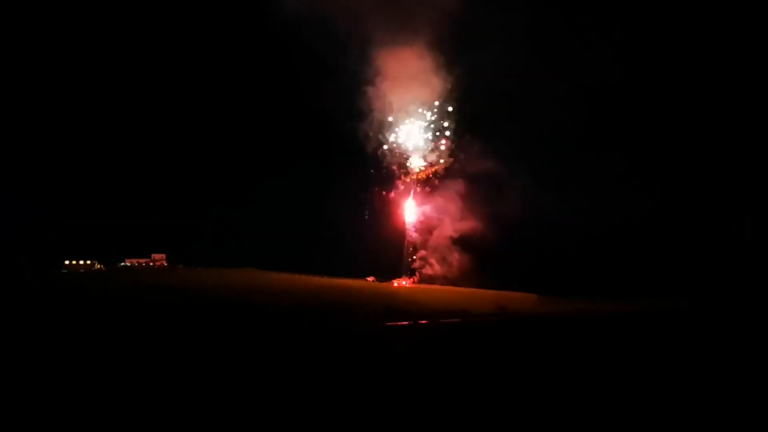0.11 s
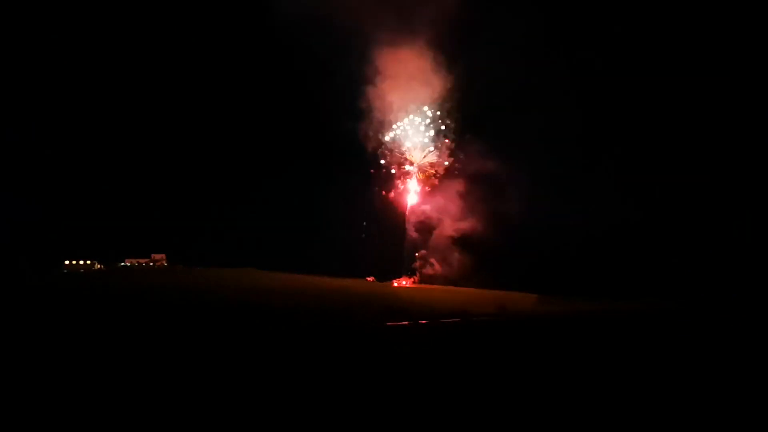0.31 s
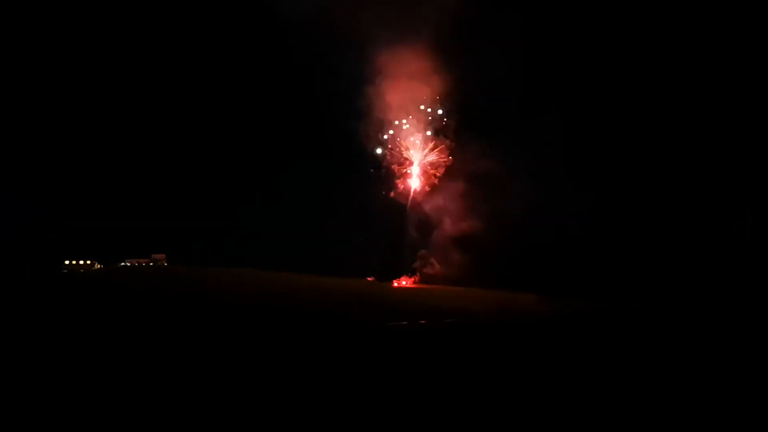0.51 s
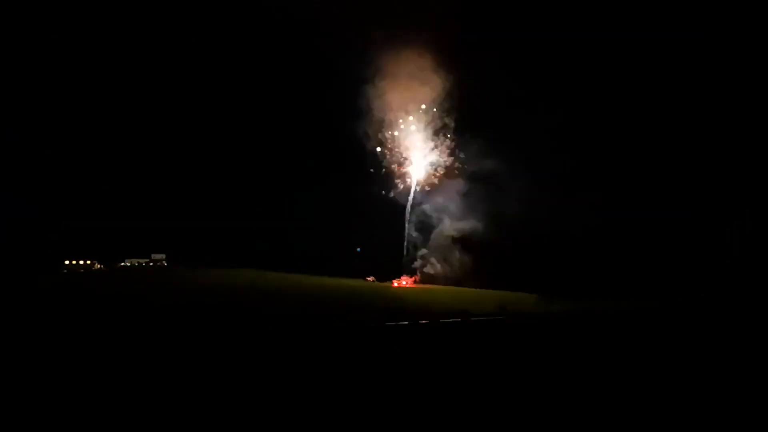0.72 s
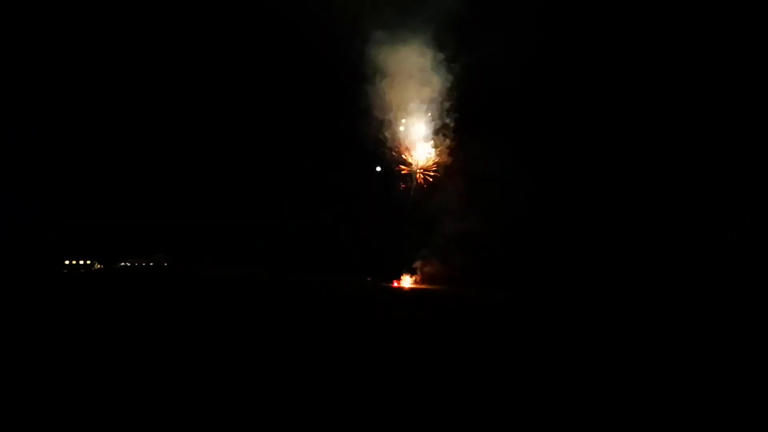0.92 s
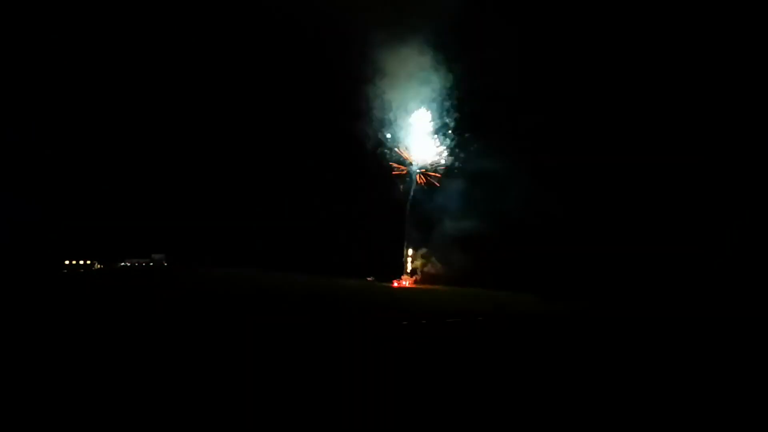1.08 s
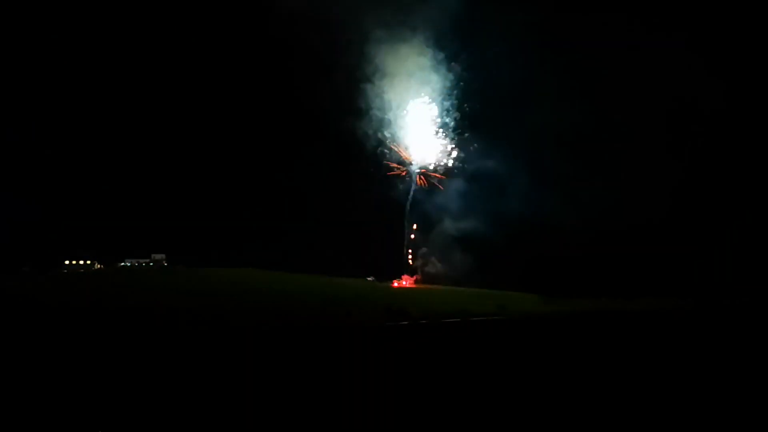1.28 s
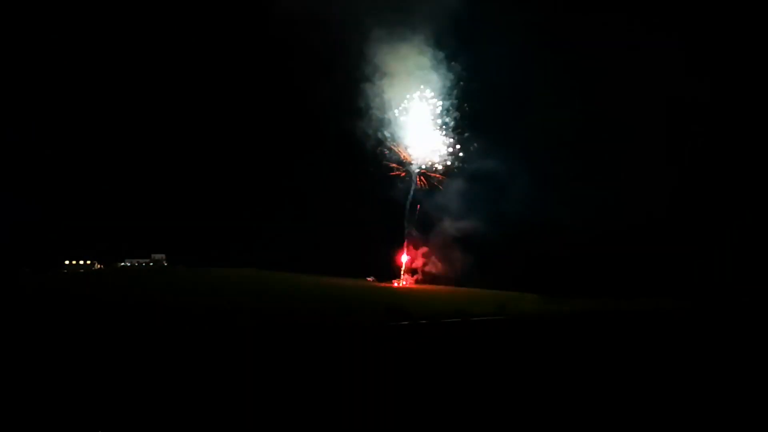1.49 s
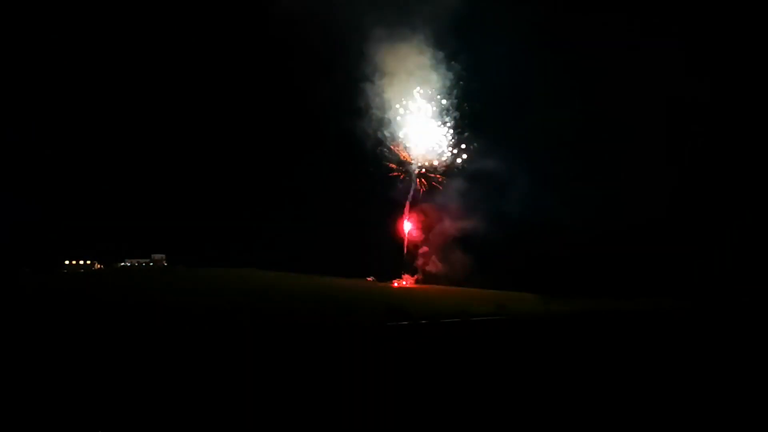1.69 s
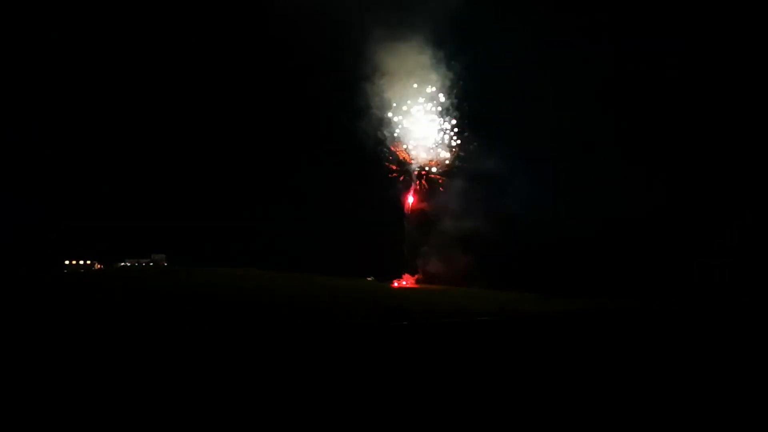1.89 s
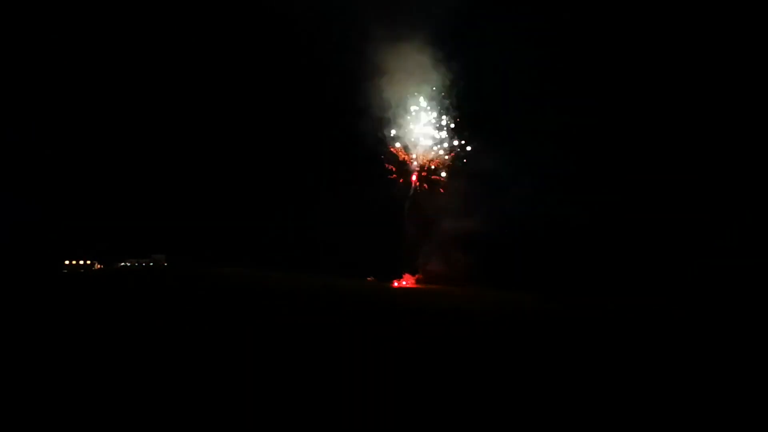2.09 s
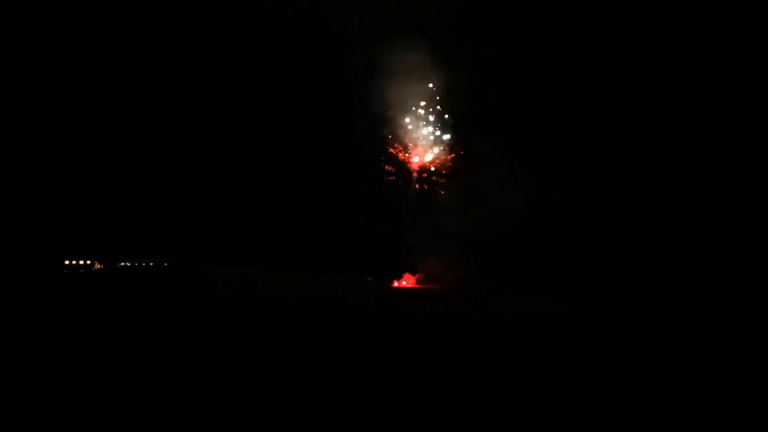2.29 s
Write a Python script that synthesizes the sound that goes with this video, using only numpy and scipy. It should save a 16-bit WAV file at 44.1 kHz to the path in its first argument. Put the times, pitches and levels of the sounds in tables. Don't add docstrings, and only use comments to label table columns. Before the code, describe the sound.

Fireworks over an open night field. A low rumble and fading earlier echo lead to the strongest sharp crack at 0.23 s. Four ringing mortar thumps, some snapping, cluster from 0.33 to 0.49. A clear crack follows at 0.86, three quick ones at 1.55, 1.62 and 1.71, another at 2.0, then a soft launch thump at 2.16. Each bang scatters and swells back from far edges.

```python
import sys
import numpy as np
from scipy import signal
from scipy.fft import rfft, irfft, next_fast_len
from scipy.io import wavfile
from scipy.ndimage import uniform_filter1d

SR = 44100
rng = np.random.default_rng(int(sys.argv[2]) if len(sys.argv) > 2 else 0)


def ratio_of_db(decibels):
    return 10 ** (np.asarray(decibels, float) / 20)


def master(y):
    cut = np.clip(np.atleast_2d(y).T, -1, 1)
    pcm = np.round(cut * 32767)
    wavfile.write(sys.argv[1], SR, pcm.astype(np.int16))


N = 108045
LEAD = SR // 2
OPPOSED = np.array([[1], [-1]])


def at_hz(points, hz):
    p = np.array(points)
    return np.interp(np.log(hz), np.log(p[:, 0]), p[:, 1])


def drift(rate, size):
    knots = rng.standard_normal(size // 100 + 2)
    return np.interp(np.arange(size) * rate / SR, np.arange(len(knots)), knots)


def add(out, s, sound):
    i = int(round(s * SR))
    out[..., i:i + sound.shape[-1]] += sound[..., :out.shape[-1] - i]


def filtered(x, order, hz, kind):
    return signal.sosfilt(signal.butter(order, hz, kind, fs=SR, output="sos"), x)


# freq_hz, likeness (-1 to 1)
PORT_LIKENESS = [(60, 0.48), (150, 0.63), (380, -0.42), (950, -0.17), (2380, 0.17), (5980, 0.078),
                 (15000, -0.27)]


def banded(spectrum, shape_db, size):
    out, power = 0, 0
    edges = 22 * 2 ** np.arange(0, 9.6, .5)
    settle = 4000
    white = rng.standard_normal((2, 2, size + settle))
    for k, (low, high) in enumerate(zip(edges, edges[1:])):
        mid, side = filtered(white[k % 2], 2, [low, high], "band")[:, settle:]
        hz = np.sqrt(low * high)
        alike = np.clip(at_hz(PORT_LIKENESS, hz), -.98, .995)
        gain = ratio_of_db(at_hz(spectrum, hz) - at_hz(TONE_COLOUR, hz))
        power += gain ** 2 * (high - low) * 2 / SR
        pair = mid + np.sqrt((1 - alike) / (1 + alike)) * side * OPPOSED
        out = out + gain * ratio_of_db(shape_db(hz)) * pair
    return out / np.sqrt(power)


# freq_hz, density_db (per Hz)
NIGHT_SPECTRUM = [(15, -50), (25, -11), (70, 1), (149, -34), (615, -21), (1090, -26.5), (1300, -24.5),
                  (2130, -21), (12000, -69.5), (15600, -102), (22000, -120)]


def night():
    shared = drift(1.3, N)
    return ratio_of_db(-57.5) * banded(NIGHT_SPECTRUM, lambda hz: shared + 0.5 * drift(4, N), N)


def wash(near_db, early, far, late, events):
    near_t60_s = 0.027
    field_db, field_t60_s, boom_longer = -26, 0.22, 0.14
    far_db, far_peak_s, far_width_s = -45, .14, 0.065
    farther_db, farther_peak_s, farther_width_s = -55.5, 0.326, 0.093
    long_db, long_t60_s, treble_faster = -45, 2.58, 0.21
    bass_rise_cycles, left_lean_db = 5.6, 0.93
    size = 3 * LEAD
    t = np.arange(size) / SR
    lumps = drift(86.7, size)

    def summed(*parts_db):
        power = sum(ratio_of_db(p) ** 2 for p in parts_db) * np.minimum(t / 0.003, 1)
        return 10 * np.log10(power + 1e-20) + 2.0 * lumps + 2.0 * drift(17.5, size)

    def early_db(hz):
        near = near_db - 60 * t / near_t60_s
        field = field_db - 60 * t * (hz / 1000) ** boom_longer / field_t60_s
        rise = np.minimum(t[:LEAD] * hz / bass_rise_cycles, 1) + 0.0012
        return summed(near, field)[:LEAD] + 20 * np.log10(rise)

    def far_edges_db(hz):
        edge = far_db - 9 * ((t - far_peak_s) / far_width_s) ** 2
        farther = farther_db - 9 * ((t - farther_peak_s) / farther_width_s) ** 2
        return summed(edge, farther)[:LEAD]

    def late_db(hz):
        return summed(long_db - 60 * t * (hz / 1000) ** treble_faster / long_t60_s)

    shots = np.zeros(N + LEAD)
    for s, db in events:
        shots[LEAD + int(s * SR)] = ratio_of_db(db)
    echoes = banded(late, late_db, size)
    echoes[:, :LEAD] += banded(far, far_edges_db, LEAD)
    echoes *= ratio_of_db(left_lean_db * OPPOSED)
    echoes[:, :LEAD] += banded(early, early_db, LEAD)
    return signal.fftconvolve(shots[None], echoes, axes=1)[:, LEAD:LEAD + N]


# freq_hz, density_db (per Hz)
EARLY_SPECTRUM = [(18, -5), (30, -1.5), (195, -1.5), (552, -9), (629, -14), (1340, -20.5), (1690, -12.5),
                  (7240, -35), (15000, -44)]
# freq_hz, density_db (per Hz)
FAR_SPECTRUM = [(18, -53), (30, 0), (154, 10.5), (612, -17.5), (953, 4), (1240, -48.5), (1690, -1.5),
                (7630, -18), (15000, -31)]
# freq_hz, density_db (per Hz)
LATE_SPECTRUM = [(30, -2.5), (70, -23.5), (200, -8), (600, -11), (900, -7.5), (1800, -15), (7600, -22),
                 (15000, -45)]


def burst_wash():
    earlier = (-.45, -1.5)    # start_s, level_db
    events = [burst[:2] for burst in SHELL_BURSTS] + [earlier]
    return wash(-10.5, EARLY_SPECTRUM, FAR_SPECTRUM, LATE_SPECTRUM, events)


def shock(stretch):
    front_ms, suction_db, suction_place_ms, suction_width_ms = 0.12 * 1.1, -13, 1.5, 0.62
    ms = np.arange(600) * 1000 / SR / stretch
    suction = ratio_of_db(suction_db) * np.exp(-((ms - suction_place_ms) / suction_width_ms) ** 2)
    return 1.74 * np.exp(-(ms / front_ms) ** 2) - suction


# start_s, level_db, ground_echo_db, pulse_stretch (ratio)
SHELL_BURSTS = [
    (0.2322, 1, -6, 1.26),
    (.8575, -0.5, -8.5, 1.06),
    (1.5549, -1.5, -11.5, 1.03),
    (1.6232, -2.5, -6.5, 1.35),
    (1.7145, -2.5, -9, 1.09),
    (2.0066, -1.5, -9, 1.23),
]
GROUND_LAGS = [3.65, 3.5, 3.35, 3.65, 4.1, 3.85]
WALL_LAGS = [23, 22, 19.5, 26, 14, 27]


def bursts():
    wall_db, port_lag_ms, port_echo_db = -20, .1, -3.5
    body_ms, body_db = 2.9, -20.5
    wall_lean_db = np.array([[2.0], [-3.0]])
    out = np.zeros((2, N))
    for (s, db, echo_db, stretch), ground_ms, wall_ms in zip(SHELL_BURSTS, GROUND_LAGS, WALL_LAGS):
        crack = shock(stretch)
        dull = signal.lfilter([.25], [1, -.75], crack)
        add(out, s, ratio_of_db(db) * crack)
        add(out, s + body_ms / 1000, ratio_of_db(db + body_db) * crack)
        add(out[0], s + ground_ms / 1000, ratio_of_db(db + echo_db - port_echo_db) * dull)
        add(out[1], s + (ground_ms - port_lag_ms) / 1000, ratio_of_db(db + echo_db + port_echo_db) * dull)
        add(out, s + wall_ms / 1000, ratio_of_db(db + wall_db + wall_lean_db) * dull)
    return filtered(out + 1e-18, 1, 13, "high")


# start_s, thump_db, ring_db, crack_db, upper_tones_db
MORTARS = [
    (0.3293, -20.5, -28.5, -16, -1.5),
    (0.4279, -15.5, -19, -11, -12),
    (.4632, -17.5, -20.5, -11.5, 2.5),
    (.4934, -18, -18, -7, -10.5),
    (2.1639, -15.5, -20.5, -41, -8),
]
# pitch_hz, level_db, fade_ms
TUBE_TONES = [(1646, -0.5, 0.77), (2080, -1.5, 0.76), (2976, 5, 0.8), (3620, -15, 1.73), (4650, -24, .8),
              (5600, -12.5, 1.04)]
# lag_ms, level_db
RING_RETURNS = [(10, -10), (24, -19), (35.5, -11)]
# lag_ms, level_db
THUMP_RETURNS = [(17, -13.5), (45, -20.5), (84, -27)]


def gas_push(ms):
    thump_hz, peak_ms, width_ms, turn_rad = 90.3, 6.6, 4.26, 0.22
    swell = np.exp(-((ms - peak_ms) / width_ms) ** 2 / 2)
    return swell * np.cos(2 * np.pi * thump_hz * ms / 1000 - turn_rad) * np.minimum(ms / 0.27, 1)


def tube_ring(ms, upper_db, chance):
    sag_per_ms, flutter_db, spread_db, pitch_spread = .004, 2.5, 1.2, .012
    sagged_ms = ms * (1 - sag_per_ms * np.minimum(ms, 20))
    tones = []
    for k, (hz, db, fade_ms) in enumerate(TUBE_TONES):
        level_db = db + spread_db * chance[2 * k] + upper_db * (k > 0) + flutter_db * drift(470, len(ms))
        envelope = (ms / fade_ms + 0.26) * np.exp(.6 - ms / fade_ms)
        pitch_hz = hz * (1 + pitch_spread * chance[2 * k + 1])
        tones.append(ratio_of_db(level_db) * envelope * np.cos(2 * np.pi * pitch_hz * sagged_ms / 1000))
    return tones


def launches():
    puff_db, puff_ms = -3, 1.4
    out, ms = np.zeros((2, N)), np.arange(4000) * 1000 / SR
    thump = gas_push(ms)
    blurred = uniform_filter1d(np.roll(thump, 60), size=120)
    puff = (ms / puff_ms) * np.exp(1 - ms / puff_ms)
    draws = rng.normal(0, 1, (len(MORTARS), 2 * len(TUBE_TONES)))
    for (s, thump_db, ring_db, crack_db, upper_db), chance in zip(MORTARS, draws):
        tones = tube_ring(ms, upper_db, chance)
        crack = ratio_of_db(crack_db) * np.exp(-ms / 0.079) * (1 - ms / 0.065)
        gas = filtered(rng.standard_normal((2, len(ms))), 2, [1300, 6500], "band")
        add(out, s, ratio_of_db(ring_db + upper_db + puff_db) * gas * puff)
        add(out, s, ratio_of_db(thump_db) * thump + ratio_of_db(ring_db) * sum(tones) + crack)
        for lag_ms, db in RING_RETURNS:
            add(out, s + lag_ms / 1000, ratio_of_db(ring_db + db) * tones[0])
        for lag_ms, db in THUMP_RETURNS:
            add(out, s + lag_ms / 1000, ratio_of_db(thump_db + db) * blurred)
    return out


# freq_hz, density_db (per Hz)
LAUNCH_SPECTRUM = [(18, -59), (30, -1), (107, 6.5), (216, -46.5), (1060, -22), (1650, -7.5), (2370, -10),
                   (7830, -37.5), (15000, -63)]


def launch_wash():
    events = [(s, thump_db + 15.5) for s, thump_db, *_ in MORTARS]
    return ratio_of_db(-10) * wash(-18, LAUNCH_SPECTRUM, LAUNCH_SPECTRUM, LAUNCH_SPECTRUM, events)


# pitch_hz, width_hz, level_db
SIDE_RESONANCES = [(590, 610, -22), (2130, 300, -12), (8400, 2400, -5.5)]


def opposed_ring(direct):
    mid, side = direct.mean(0) + 1e-18, 0
    for hz, width_hz, db in SIDE_RESONANCES:
        r = np.exp(-np.pi * width_hz / SR)
        feed = (1 - r * r) / 2 * np.array([1, 0, -1])
        poles = [1, -2 * r * np.cos(2 * np.pi * hz / SR), r * r]
        side = side + ratio_of_db(db) * signal.lfilter(feed, poles, mid)
    return side * OPPOSED


def scene():
    background = night() + burst_wash()
    direct = bursts() + launches()
    return background + direct + opposed_ring(direct) + launch_wash()


def top_cut(x):
    return signal.sosfilt(signal.butter(12, 16310, fs=SR, output="sos"), x)


# freq_hz, level_db
TONE_COLOUR = [(30, 2.5), (90, 0), (1200, 1.5), (1750, 4), (2500, -0.5), (7500, -3), (10000, -21),
               (15000, -14.5)]


def record(dry):
    top, treble_hz, side_low_hz, side_leak, hiss_db = 1.04, 9480, 228, 0.051, -82
    size = next_fast_len(N + 8000)
    hz = np.arange(size // 2 + 1) * SR / size + 1
    x = irfft(rfft(dry, size) * ratio_of_db(at_hz(TONE_COLOUR, hz)) * hz / (hz + 10), size)[:, :N]
    x = top * np.tanh(x / top)
    x = signal.sosfiltfilt(signal.butter(2, treble_hz, fs=SR, output="sos"), x)
    apart = x[0] - x[1]
    narrow = signal.butter(2, side_low_hz, "high", fs=SR, output="sos")
    side = signal.sosfiltfilt(narrow, apart / 2) + side_leak * apart
    hiss = ratio_of_db(hiss_db) * rng.standard_normal((2, N))
    mix = np.clip(x.mean(0) + side * OPPOSED + hiss, -1, 1)
    return top_cut(mix)


dry = scene()
out = record(dry)
master(out)
```